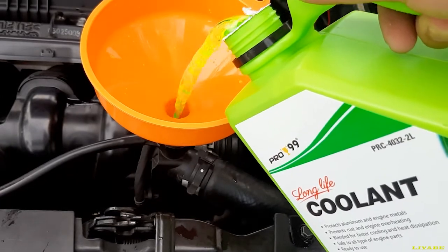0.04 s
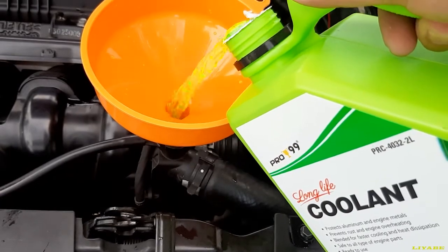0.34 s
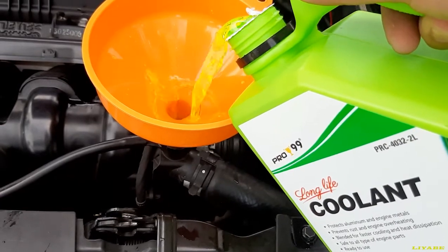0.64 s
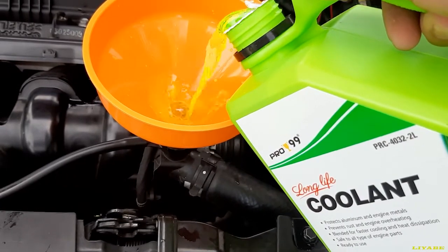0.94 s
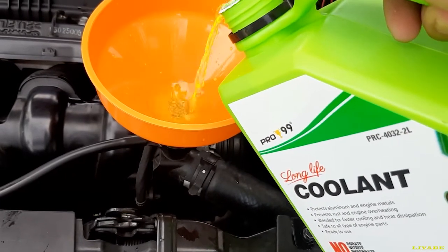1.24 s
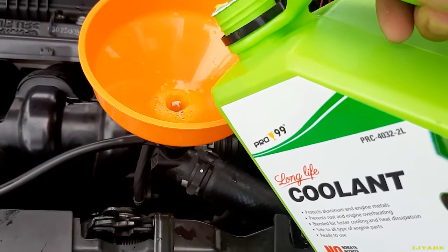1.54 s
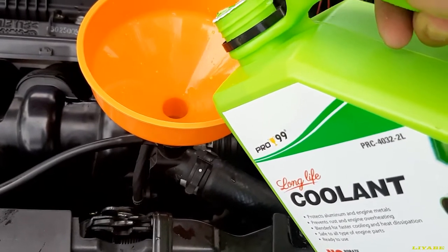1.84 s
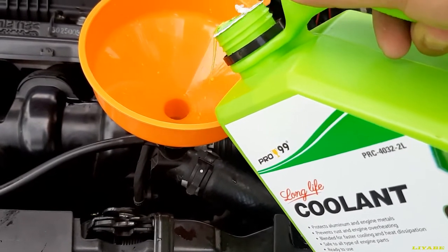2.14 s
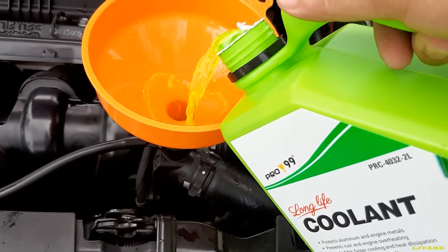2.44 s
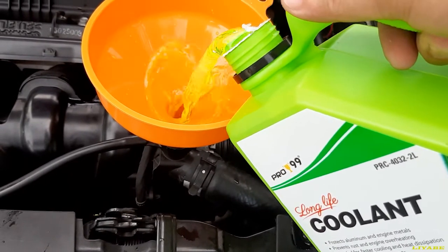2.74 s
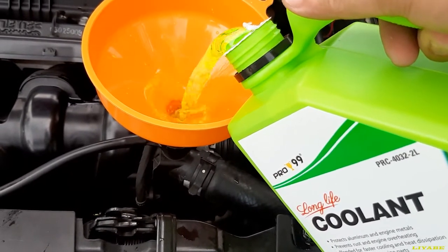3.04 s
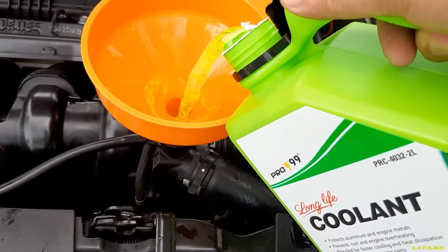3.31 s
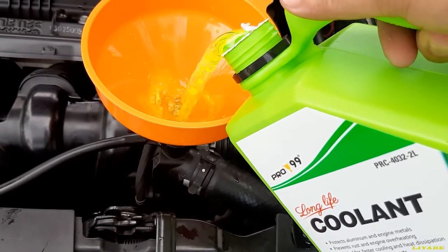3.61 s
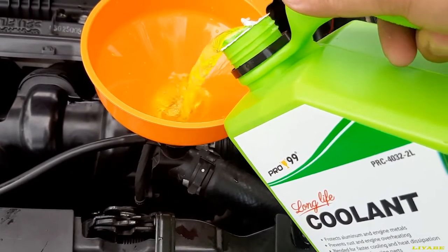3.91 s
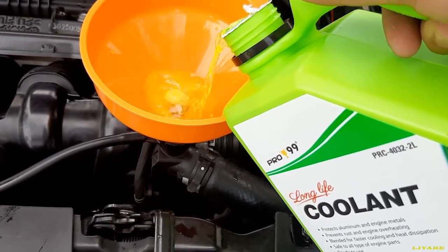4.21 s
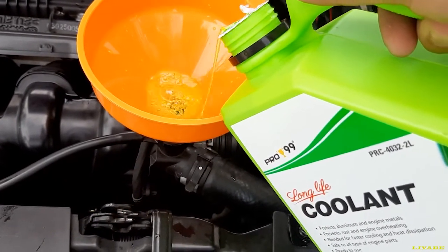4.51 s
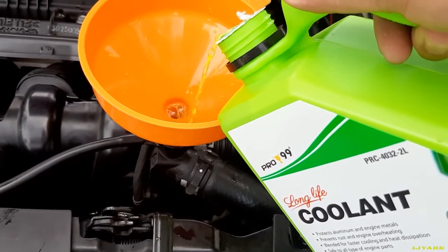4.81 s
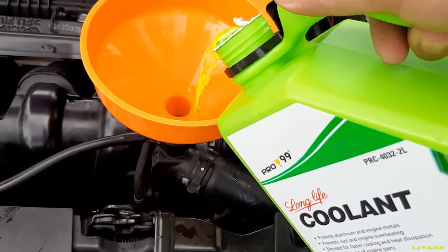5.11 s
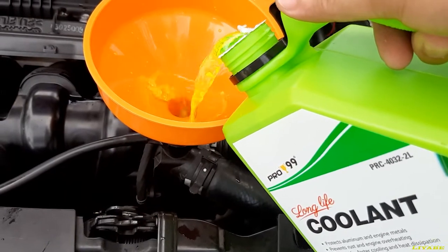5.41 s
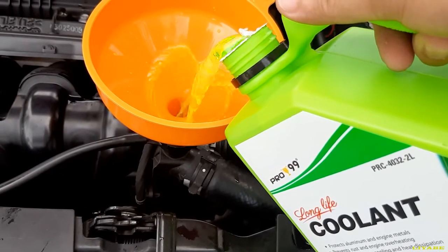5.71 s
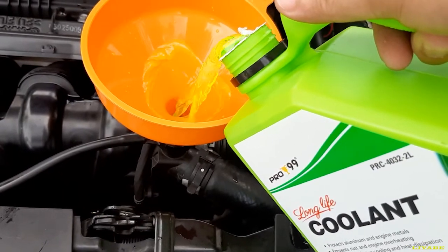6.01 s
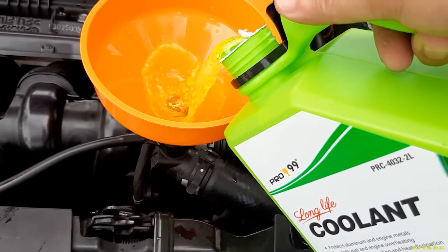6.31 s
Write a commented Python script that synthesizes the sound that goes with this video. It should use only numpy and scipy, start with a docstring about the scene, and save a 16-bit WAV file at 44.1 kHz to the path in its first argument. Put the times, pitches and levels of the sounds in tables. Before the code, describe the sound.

Liquid glugs from a plastic jug into a plastic funnel in three splashy, bubbling pours, with gusts of wind on the microphone.

```python
"""Coolant glugs from a plastic jug into a plastic funnel on a stopped engine, in three pours.
The first starts at once: liquid churns, spray ticks, and trapped air bubbles ring in the funnel's cone.
Gusts soon buffet the microphone, mostly on the right, and air pockets in the neck gulp upward in pitch.
At 2 seconds the wind drops and the stream pauses. The second pour starts near 2.5 seconds and swells.
After another pause, a gentler third pour begins near 5.5 seconds."""
import sys
import numpy as np
from scipy import signal
from scipy.fft import rfft, irfft
from scipy.io import wavfile
from scipy.ndimage import uniform_filter1d

SR = 44100
rng = np.random.default_rng(int(sys.argv[2]) if len(sys.argv) > 2 else 0)


def dump_mix(stems):
    """Bounce the given channels to the path in sys.argv[1] as a 16-bit WAV at rate SR."""
    frames = np.atleast_2d(stems).T  # one column per channel
    limited = np.clip(frames, -1, 1)  # hard clip at full scale
    pcm = np.round(limited * 32767).astype(np.int16)
    wavfile.write(sys.argv[1], SR, pcm)


N = 280035
TIME = np.arange(N) / SR

# Levels in the tables are relative: the functions turn them up or down.
# The stream from the jug. Each row: time in seconds, level in dB.
STREAM = [(0, -29), (.45, -34.5), (.53, -51), (.63, -56.5), (.76, -51), (1.33, -47.5), (1.47, -65.5),
          (1.95, -68), (2.1, -93), (2.48, -74), (2.68, -55), (2.96, -44), (3.14, -33), (3.4, -37.5),
          (3.77, -50.5), (4.08, -47), (4.28, -71.5), (5.45, -71), (5.72, -53), (6.2, -52), (6.35, -50.5)]
# Slugs of liquid hitting the funnel. Each row: start and end in seconds, then churning, spray and
# glugging levels in dB.
SLUGS = [(.15, .2, -28.5, -52, -60), (.342, .37, -30.5, -44, -45.5), (.435, .45, -26, -63, -58),
         (.71, .75, -47.5, -47, -65), (.82, .9, -49.5, -44.5, -68), (.995, 1.03, -33.5, -49.5, -42.5),
         (1.105, 1.135, -46.5, -52, -52), (1.26, 1.33, -39, -47.5, -67), (1.378, 1.395, -36, -60.5, -37.5),
         (1.65, 1.665, -41.5, -59.5, -62), (1.755, 1.78, -45.5, -84, -43.5),
         (1.975, 2.005, -44.5, -72.5, -41.5), (2.69, 2.71, -38.5, -73, -69), (2.825, 2.85, -50, -63, -48.5),
         (2.945, 2.96, -44.5, -58.5, -48), (3.012, 3.04, -39.5, -39.5, -69),
         (3.095, 3.115, -31, -46.5, -40.5), (3.16, 3.18, -29.5, -58.5, -40),
         (3.225, 3.265, -31.5, -48, -49.5), (3.32, 3.35, -34.5, -60, -58), (3.495, 3.55, -47, -46.5, -45.5),
         (3.655, 3.69, -42.5, -50.5, -49.5), (3.812, 3.86, -34.5, -50, -55), (4.115, 4.155, -56, -49, -84),
         (4.38, 4.395, -44.5, -62, -58), (4.625, 4.66, -42.5, -68, -61), (4.69, 4.73, -36.5, -65.5, -46.5),
         (5.725, 5.76, -46, -78, -41.5), (5.915, 5.945, -39.5, -77, -42.5),
         (6.025, 6.045, -42.5, -49.5, -74), (6.125, 6.22, -52, -46, -77)]
# The tone of six sounds. Each row: frequency in Hz, level in dB.
CHURN_TONE = [(400, -23.5), (650, -8), (800, -10), (1130, -5), (1330, -12), (1550, -10), (2100, -1.5),
              (2800, 2.5), (3300, -21.5), (4500, -17.5), (5300, -61.5), (8000, -37), (16000, -70.5)]
GLUG_TONE = [(120, -25), (220, -25), (320, 9), (550, 3), (750, 8.5), (1100, -34), (3000, -64.5)]
SPRAY_TONE = [(800, -15), (2500, 7.5), (4500, 8), (6000, -0.5), (7500, 2), (8700, -8), (10000, -2),
              (11500, 1), (15800, 2.5)]
RUMBLE_TONE = [(12, -45.5), (28, -15), (45, 1.5), (75, 8), (120, 1.5), (190, -9.5), (300, -30.5),
               (600, -38.5), (2000, -85)]
FLUTTER_TONE = [(80, -32.5), (180, 3.5), (260, 4.5), (400, -6.5), (600, -22), (1000, -33.5), (2500, -52.5),
                (6000, -81)]
HISS_TONE = [(100, 5.5), (250, -2.5), (400, -3.5), (700, -9.5), (1500, -13), (3000, -22), (6000, -20),
             (9000, -31.5), (11500, -22.5), (16000, -50.5)]
# Flurries of droplets thrown against the cone. Each row: time in seconds, level in dB.
FLURRIES = [(0.055, -31.5), (0.095, -37), (0.1597, -27.5), (.2042, -41), (0.252, -33), (0.277, -38),
            (.3736, -35), (0.4626, -40.5), (0.763, -26), (0.8015, -40), (.985, -45), (1.0177, -42),
            (1.257, -33), (1.311, -43), (0.559, -56), (2.557, -51.5), (2.934, -36), (3.013, -38),
            (3.0383, -34), (3.1308, -34.5), (3.153, -35), (3.271, -41), (3.5414, -40), (3.816, -34.5),
            (3.8293, -31.5), (4.1236, -41), (5.5762, -53), (5.785, -46), (5.808, -44.5), (5.998, -40.5),
            (6.0253, -35), (6.192, -44)]
# The cone's hum as a thin stream runs down the spout. Each row: time in seconds, level in dB.
CONE_HUM = [(0, -38), (.45, -48), (.6, -85), (1.3, -71), (2.05, -78.5), (2.2, -73), (2.45, -90),
            (2.57, -56), (2.75, -47), (3.1, -52), (3.6, -102), (4.25, -59.5), (4.55, -102), (5.2, -83),
            (5.28, -52.5), (5.4, -74.5), (5.6, -50.5), (6.05, -45.5), (6.35, -72)]
# The notes at which the funnel's air rings. Each row: pitch in Hz, width in Hz, level in dB.
FUNNEL_NOTES = [(795, 70, 0), (1120, 80, 2), (1518, 42, 8), (2036, 55, 6), (2505, 60, 2), (2760, 70, 1),
                (3040, 80, -3), (3800, 200, -7), (4500, 220, 2)]
# Echoes in the engine bay. Each row: frequency in Hz, seconds to fade by 60 dB.
BAY_ECHOES = [(200, 0.17), (1500, 0.22), (4000, 0.1), (14000, 0.097)]
# How much louder the liquid is on the left. Each row: frequency in Hz, lead over the right in dB.
LEFT_LEAD = [(400, 1), (1000, 3), (1600, 3), (2800, 5), (4500, 5.5),
             (7000, .5), (9000, -1), (14000, .5)]
# The breeze on the microphone. Each row: time in seconds, left level in dB, right level in dB.
BREEZE_LEVELS = [(0, -50, -43.5), (.85, -52, -41), (1.35, -44.5, -38), (1.92, -44.5, -32.5),
                 (2.05, -57, -80), (2.9, -56.5, -82), (4.1, -55, -84), (5.1, -55.5, -54.5), (5.5, -54, -56),
                 (5.65, -54.5, -71), (6.35, -59, -68)]
# Bubbles that stand out of the pour. Each row: time in seconds, level in dB, pitch in Hz.
BIG_BUBBLES = [(.041, -19.5, 2650), (0.065, -16.5, 1550), (0.0963, -15.5, 1520), (0.1447, -18, 1540),
               (0.1695, -12, 2300), (0.1954, -12, 1350), (0.2416, -18, 1470), (.254, -15.5, 1670),
               (0.2637, -11.5, 1470), (0.333, -9, 1175), (0.3517, -16.5, 1600), (0.3601, -21, 1600),
               (0.3716, -14.5, 2410), (0.3999, -9.5, 1800), (0.4315, -13, 1990), (0.4412, -17, 1560),
               (0.46, -21.5, 1950), (0.4955, -16, 2230), (0.5598, -32.5, 880), (.659, -30.5, 2013),
               (0.679, -24.5, 1870), (0.6916, -26.5, 2260), (0.7156, -18.5, 2190), (.764, -15.5, 1960),
               (.859, -17, 2230), (0.9992, -27, 1164), (1.047, -28.5, 990), (1.0727, -26.5, 2200),
               (1.1096, -27, 1130), (1.1269, -13, 2370), (1.2272, -22, 1585), (1.256, -26.5, 1543),
               (1.31, -24, 2570), (1.3685, -8.5, 2220), (1.6363, -16, 1367), (1.662, -18.5, 2460),
               (1.825, -31.5, 4590), (1.9925, -33.5, 2270), (2.135, -67, 1550), (2.22, -59, 1600),
               (2.5262, -37.5, 1983), (2.5565, -38, 1537), (2.5921, -41, 858), (2.681, -33.5, 1510),
               (2.7057, -30, 1960), (2.7696, -25, 1400), (2.7973, -29, 1470), (2.8233, -25.5, 1090),
               (2.8392, -25.5, 926), (2.8481, -26, 1230), (2.934, -24, 1670), (2.972, -15, 1870),
               (2.9874, -27, 2054), (3.011, -13, 1550), (3.0368, -23, 2100), (3.0957, -17, 1670),
               (3.1137, -20.5, 1320), (3.1308, -13.5, 1940), (3.1544, -21.5, 2030), (3.163, -13.5, 1830),
               (3.171, -14, 1570), (3.204, -19.5, 1680), (3.231, -18.5, 1840), (3.2608, -13, 1604),
               (3.3126, -25.5, 1720), (3.3417, -9, 2040), (3.3541, -27, 2120), (3.4197, -15.5, 2470),
               (3.4407, -22.5, 2230), (3.5419, -12, 1600), (3.8152, -19.5, 1600), (3.8283, -16, 1140),
               (3.8551, -16.5, 2350), (3.8793, -19, 4360), (3.9885, -29, 3790), (4.0079, -25, 2430),
               (4.0426, -17.5, 1057), (4.0612, -23.5, 768), (4.1235, -28, 2840), (4.1384, -29.5, 2290),
               (4.2067, -44.5, 1100), (4.2365, -42, 1580), (4.3726, -34.5, 1650), (4.3816, -23, 2060),
               (4.4644, -31, 1258), (4.6738, -20, 2145), (4.6892, -24, 2220), (4.7288, -26.5, 962),
               (5.2349, -30, 1690), (5.269, -32, 1462), (5.576, -36, 2750), (5.7036, -26, 2120),
               (5.7702, -35.5, 787), (5.787, -33.5, 1460), (5.8085, -33.5, 1577), (5.9205, -25.5, 1510),
               (5.9509, -25, 2310), (5.9991, -27, 2430), (6.0474, -24, 1870), (6.1107, -23, 1690),
               (6.118, -8, 1730), (6.1731, -27, 2250), (6.19, -22, 3630), (6.232, -23, 4450)]
# The tone of the splat around a big bubble. Each row: frequency in Hz, level in dB.
SPLAT_TONE = [(300, -32.5), (600, -13.5), (800, -4), (1150, 1.5), (1550, 2), (2100, 5.5), (2800, -0.5),
              (3400, -27.5), (4500, -9.5), (5500, -35), (9000, -43)]
# Gusts. Each row: start and end in seconds, left and right rumble in dB, flap pitch in Hz, flap in dB.
WIND_GUSTS = [(0.14, .165, -48, -55, 136, -31), (0.197, 0.3, -45, -33, 180, -33.5),
              (0.625, 0.662, -56, -30, 220, -38), (.688, 0.746, -56, -47, 213, -35),
              (0.918, 0.934, -39, -30, 270, -40.5), (1.011, 1.092, -48, -34, 210, -24.5),
              (1.092, 1.16, -41, -40, 200, -40.5), (1.333, 1.396, -40, -23, 242, -27),
              (1.466, 1.503, -53, -30.5, 300, -28), (1.51, 1.588, -40.5, -24.5, 291, -26),
              (1.539, 1.551, -50, -38, 534, -21), (1.828, 1.856, -51, -22, 285, -26),
              (1.858, 1.941, -51, -34, 180, -23), (3.227, 3.273, -40, -44, 135, -48.5),
              (3.498, 3.523, -40, -45, 131.6, -47.5), (3.688, 3.766, -41.5, -38, 100, -56),
              (5.823, 5.903, -41.5, -74, 150, -60), (5.928, 5.967, -37, -35, 135, -61),
              (6.111, 6.127, -38, -37, 125, -36.5), (6.2, 6.227, -42.5, -70, 110, -49)]
# Thin films of liquid that burst. Each row: time in seconds, level in dB, pitch in Hz.
FILM_BURSTS = [(.146, -29, 13400), (.34, -30.5, 6640), (.482, -26, 12200), (.561, -35, 11700),
               (.764, -43, 7700), (1.128, -38, 9350), (1.26, -26.5, 13300), (1.283, -36, 12500),
               (1.347, -31, 7800), (1.349, -28, 12400), (3.494, -29.5, 5300)]
# Froth sucked through the spout. Each row: start and end in seconds, pitch in Hz, level in dB.
FROTH_SLURPS = [(0.24, 0.249, 2360, -27), (0.44, 0.453, 2750, -23.5), (0.7, 0.751, 2420, -32.5),
                (1.369, 1.375, 2850, -22), (1.63, 1.643, 3040, -33), (1.657, 1.679, 3750, -41.5),
                (1.757, 1.778, 2210, -58), (1.791, 1.848, 4000, -52), (1.912, 2.02, 2300, -56.5),
                (2.703, 2.723, 2020, -52), (2.788, 2.83, 4360, -47.5), (3.003, 3.013, 2700, -30),
                (3.092, 3.109, 2070, -25.5), (3.17, 3.174, 1980, -27), (3.413, 3.437, 2560, -34),
                (3.58, 3.59, 2300, -36), (3.815, 3.836, 2350, -29), (4.61, 4.641, 2100, -60),
                (4.672, 4.734, 1890, -36.5), (4.751, 4.762, 1960, -45.5), (5.317, 5.36, 4200, -66.5),
                (5.702, 5.743, 1370, -45.5), (5.781, 5.805, 5450, -43.5), (5.97, 5.988, 3900, -45),
                (6.022, 6.044, 4730, -38.5)]
# Single swirls of air. Each row: time in seconds, level in dB, pitch in Hz.
AIR_SWIRLS = [(0.281, -19.5, 80), (1.057, -17, 191), (1.075, -14, 132), (1.35, -24, 131.3),
              (1.5234, -16, 306), (1.5422, -23, 614), (1.5448, -21, 476), (1.872, -5.5, 88)]
# Air pockets in the neck. Each row: start and end in seconds, first and last pitch in Hz, level in dB.
AIR_POCKETS = [(0.469, 0.501, 667, 1050, -35.5), (0.95, 0.971, 940, 1060, -46.5),
               (0.985, 1.015, 515, 1660, -34), (1.041, 1.055, 790, 1170, -35),
               (1.88, 1.907, 580, 1114, -42.5), (2.947, 2.959, 717, 880, -29),
               (2.968, 2.993, 1730, 2200, -32), (3.461, 3.49, 541, 980, -34),
               (3.512, 3.561, 890, 1780, -34.5), (3.667, 3.718, 508, 1160, -42),
               (4.055, 4.096, 805, 1580, -39), (4.706, 4.721, 418, 515, -35),
               (5.492, 5.546, 1360, 2000, -53.5), (5.619, 5.697, 1620, 2480, -47),
               (5.808, 5.891, 840, 2050, -50), (6.012, 6.059, 1600, 2400, -36.5),
               (6.077, 6.09, 834, 1190, -39.5), (6.304, 6.35, 310, 620, -48.5)]

FULL_FLOW_DB = -28.5


def amp(db):
    """Turns decibels into a gain."""
    return 10 ** (np.asarray(db) / 20)


def unit(x):
    """Scales a sound to an average power of 1."""
    return x / np.sqrt(np.mean(x ** 2) + 1e-20)


def curve(table, column):
    """Joins a column's points into a value for every sample."""
    rows = np.array(table)
    return np.interp(TIME, rows[:, 0], rows[:, column])


def read(points, hz):
    """Looks up a frequency table at the given frequencies."""
    known_hz, value = np.transpose(points)
    return np.interp(np.log(hz + 1), np.log(known_hz), value)


def add(mix, s, sound):
    """Lays a sound into the mix at s seconds."""
    part = mix[max(round(s * SR), 0):][:len(sound)]
    part += sound[:len(part)]


def convolve(x, response):
    """Filters one or two channels."""
    return signal.fftconvolve(np.atleast_2d(x), np.atleast_2d(response), axes=1)[:, :N]


def colour(x, tone, size=4096):
    """Gives a sound the tone in a table, at a power of 1."""
    log_gain = np.log(amp(read(tone, abs(np.fft.fftfreq(size, 1 / SR)))))
    spectrum = np.exp(np.conj(signal.hilbert(log_gain)))  # rings after a hit, never before
    return unit(convolve(x, np.fft.ifft(spectrum).real))


def steady(x, span_s):
    """Evens out a texture's slow swings and keeps its grain."""
    size = max(int(span_s * SR), 2)
    power = (np.atleast_2d(x) ** 2).mean(0)
    power = uniform_filter1d(uniform_filter1d(power, size), size)
    return x / np.sqrt(abs(power) + 1e-6)


def lurch(depth_db, span_s):
    """A gain that jumps about at random, as the stream breaks into slugs."""
    size = max(int(span_s * SR), 2)
    swing = uniform_filter1d(rng.standard_normal(N), size)
    swing = unit(uniform_filter1d(swing, size // 3 + 1))
    return unit(amp(depth_db * np.clip(swing, -2, 2)))


def patchy(x, depth_db, patch_hz=1400, patch_s=.006):
    """Gives each splash its own tone with random patches in time and pitch."""
    spectra = signal.stft(x, SR, nperseg=128)[2]
    patches = rng.standard_normal(spectra.shape[1:])
    for axis, size in enumerate([patch_hz * 128 / SR, patch_s * SR / 64]):
        patches = uniform_filter1d(patches, max(round(size), 1), axis)
    return signal.istft(spectra * amp(depth_db * unit(patches)), SR, nperseg=128)[1][:, :N]


def swells(table, column, attack_s, release_s, lead_s=.1):
    """The power of events that rise, hold from start to end, then die away."""
    power = np.zeros(N)
    t = np.arange(SR // 2) / SR - lead_s
    for row in table:
        start, end = row[:2]
        early = np.maximum(-t, 0) / attack_s
        late = np.maximum(t - (end - start), 0) / release_s
        add(power, start - lead_s, amp(row[column]) ** 2 * np.exp(-2 * (early ** 2 + late)))
    return power


def burst(texture, start, end, hz, octaves_wide, taper):
    """A short piece of a texture, narrowed to pitches near hz, with soft ends."""
    size = max(int((end - start) * SR), 64)
    octaves = np.log2(np.fft.rfftfreq(8192, 1 / SR) / hz + 1e-6)
    spectrum = rfft(np.roll(texture, 1024 - int(start * SR))[:8192])
    band = irfft(spectrum / (1 + (octaves / octaves_wide) ** 2 / 4) ** 2)[1024:][:size]
    return unit(band * signal.windows.tukey(len(band), taper))


def noise_band(size, hz, width_hz):
    """Noise that is strongest near hz."""
    offset = (np.fft.rfftfreq(size, 1 / SR) - hz) / width_hz
    return irfft(rfft(rng.standard_normal(size)) / (1 + offset ** 2), size)


def bubble(hz, ring_s, rise, onset_cycles):
    """A bubble's note fades 60 dB in ring_s and creeps up in pitch as it nears the surface."""
    t = np.arange(2600) / SR
    ring_s = max(ring_s, .002)
    turns = hz * np.cumsum(1 + rise * (np.minimum(t / ring_s, 1) - 1 / 6)) / SR
    onset = 1 - np.exp(-(t * hz / onset_cycles) ** 2)
    return np.sin(2 * np.pi * turns) * np.exp(-np.log(1000) * t / ring_s) * onset


def swarm(low_hz, high_hz, per_s, cycles, spread_db, count=120):
    """Many bubble notes of random pitch and strength."""
    chance = rng.random(N)
    strength = np.minimum(rng.exponential(1, N), 3)
    kind = rng.integers(0, count, N)
    notes = [(-1) ** k * bubble(hz, cycles / hz, rise=.14, onset_cycles=1.2)
             for k, hz in enumerate(np.geomspace(low_hz, high_hz, count))]
    out = np.zeros(N)
    for i in np.flatnonzero(chance < per_s / SR):
        add(out, i / SR, amp(spread_db * strength[i]) * notes[kind[i]])
    return out


def pour(thin_db=-66.5):
    """Churning, spray and glugging levels in dB follow the stream and jump with each slug."""
    flow = curve(STREAM, 1)
    creeping = np.clip((thin_db - flow) / 10, 0, 1)  # a thin stream creeps down the wall: less spray
    spraying = -44.5 + .66 * (flow - FULL_FLOW_DB) - 8 * creeping
    glugging = -53.5 + .38 * (flow - FULL_FLOW_DB)
    return [10 * np.log10(amp(db) ** 2 + swells(SLUGS, column, attack_s=.014, release_s=.02))
            for column, db in enumerate([flow, spraying, glugging], start=2)]


def churn(churning, glugging):
    """The stream folds small bubbles into the pool; large soft ones glug below them."""
    small = colour(swarm(700, 5500, per_s=1400, cycles=27, spread_db=4.5), CHURN_TONE)[0]
    small = steady(small * lurch(depth_db=2.5, span_s=.007), span_s=.04)
    large = colour(swarm(270, 850, per_s=220, cycles=11, spread_db=3), GLUG_TONE)[0]
    large = steady(large, span_s=.0047)
    return small * amp(churning - 3.5) + large * amp(glugging - 3)


def spray(spraying, per_s=1400, spread_db=5, flurry_s=.0028):
    """Droplets tick on the plastic, in flurries at each spatter and as each listed bubble breaks."""
    ticks = (rng.random(N) < per_s / SR) * amp(spread_db * np.minimum(rng.exponential(1, N), 3))
    ticks *= rng.choice([-1, 1], N)
    mist = rng.standard_normal((2, N))
    drops = steady(.41 * unit(ticks) + .51 * mist, span_s=.024)
    drops = patchy(drops, depth_db=5) * lurch(depth_db=2, span_s=.008)
    flurries = np.zeros(N)
    age = np.arange(1800) / SR / flurry_s
    # louder bubbles throw more spray
    thrown = [(s, spraying[int(s * SR)] + 2.5 + .35 * (db + 19)) for s, db, _ in BIG_BUBBLES]
    for s, db in FLURRIES + thrown:
        add(flurries, s, amp(db + 1) * age * np.exp(1 - age))
    return colour(drops, SPRAY_TONE) * np.hypot(amp(spraying - 1), flurries)


def tiny_bubbles(churning, spraying):
    """Tiny bubbles ping brightly where pool and spray meet, more faintly in a thin stream."""
    pings = swarm(3400, 8000, per_s=650, cycles=50, spread_db=5)
    pings = steady(unit(pings), span_s=.04)
    level_db = .44 * (churning - 11) + .56 * spraying
    thinning_db = np.interp(level_db, [-80, -62, -46], [-14, -7, 0])
    return pings * amp(level_db - 4 + thinning_db)


def trickle():
    """Running liquid unevenly stirs the cone's strongest note into a hum."""
    hum = noise_band(N, hz=1515, width_hz=100) * lurch(depth_db=4, span_s=.014)
    return steady(hum, span_s=.13) * amp(curve(CONE_HUM, 1) - 3)


def funnel(x, ring_db=-5):
    """The air in the cone rings on after every splash."""
    t = np.arange(4000) / SR
    ring = np.zeros(len(t))
    for hz, width, db in FUNNEL_NOTES:
        fade = 2 * np.pi * width / SR * np.exp(-np.pi * width * t)
        ring += amp(db) * fade * np.cos(2 * np.pi * hz * t)
    return x + amp(ring_db) * convolve(x, ring)


def engine_bay(x, near_db=-11, near_s=.014, tail_db=-19, size=12000):
    """Quick echoes off the jug and engine covers, then a faint tail; each side gets its own."""
    t = np.arange(size) / SR
    near, far = rng.standard_normal((2, 2, size)) * (rng.random((2, 2, size)) < .1)
    near = near * np.exp(-t / near_s) * (t > .0012)
    hz, when, spectra = signal.stft(far * (t > .006), SR, nperseg=256)
    fade = np.exp(-np.log(1000) * when / read(BAY_ECHOES, hz)[:, None])
    tail = signal.istft(spectra * fade, SR, nperseg=256)[1][:, :size]
    near, tail = (echo / np.linalg.norm(echo, axis=1, keepdims=True) for echo in (near, tail))
    return convolve(x, amp(near_db) * near + amp(tail_db) * tail)


def microphone_sides(x, lag_s=.000036):
    """The left side hears the funnel a little later, and louder in the middle range."""
    hz = np.fft.rfftfreq(N, 1 / SR)
    lead_db = read(LEFT_LEAD, hz)
    left = amp(lead_db / 2) * np.exp(-2j * np.pi * hz * lag_s)
    return irfft(rfft(x) * [left, amp(-lead_db / 2)], N)


def wind():
    """Rough air rumbles on each side separately; the right flutters more in a brisk breeze."""
    breeze_db = np.array([curve(BREEZE_LEVELS, column) for column in (1, 2)])
    gust_power = [swells(WIND_GUSTS, column, attack_s=.017, release_s=.022) for column in (2, 3)]
    level = np.sqrt(amp(breeze_db) ** 2 + gust_power)
    rumble = [steady(colour(rng.standard_normal(N), RUMBLE_TONE)[0], span_s=.035) for _ in level]
    flutter = [steady(colour(rng.standard_normal(N), FLUTTER_TONE)[0], span_s=.026) for _ in level]
    flutter_db = [np.full(N, -15), np.interp(breeze_db[1], [-54, -40], [-28, -12])]
    return level * (amp(-2) * np.array(rumble) + amp(flutter_db) * np.array(flutter))


def outdoors(level_db=-70):
    """A faint, even background hiss."""
    hiss = colour(rng.standard_normal((2, N)), HISS_TONE)
    hiss = signal.sosfilt(signal.butter(2, 250, "high", fs=SR, output="sos"), hiss)
    return amp(level_db) * unit(hiss)


def stray_bubbles(churning, centre_hz=1850, octaves=.4, least_db=-54, count=150):
    """Bubbles pinch off at random while the pool churns; gives rows like BIG_BUBBLES."""
    when = (np.arange(count) + rng.random(count)) / count * (N - 1)
    level = churning[when.astype(int)]
    strength, pitch = np.clip(rng.standard_normal((count, 2)), -2, 2).T
    db = FULL_FLOW_DB + 5 + .8 * (level - FULL_FLOW_DB) + 2 * strength
    rows = np.transpose([when / SR, db, centre_hz * 2 ** (octaves * pitch)])
    return list(rows[level > least_db])


def big_bubbles(churning, splat_s=.0045):
    """Each big bubble pinches off with a wet splat, rings, and sheds a smaller twin."""
    rings, splats = np.zeros(N), np.zeros(N)
    t = np.arange(1500) / SR
    splat_shape = np.exp(-t / splat_s) * (1 - np.exp(-t / .001))
    rows = BIG_BUBBLES + stray_bubbles(churning)
    for (s, db, hz), (late, smaller) in zip(rows, rng.random((400, 2))):
        calm = np.interp(db, [-35, -26], [1, 0])  # quiet drips start softly and splash less
        ring_s = .018 * 2 ** (-(db + 20) / 42) * (1800 / hz) ** .75  # violent or small ones die sooner
        ring_s *= np.interp(churning[int(s * SR)], [-65, -35], [1.45, 1])  # longer in a still pool
        ring = bubble(hz, ring_s, rise=.05, onset_cycles=.8 + 20 * ring_s + 1.5 * calm)
        add(rings, s, amp(db - .5) * ring / abs(ring).max())
        splash_db = db - 9 * calm
        twin = bubble(hz * (1.15 + .9 * smaller), ring_s / 2, rise=.1, onset_cycles=3)
        add(rings, s + .0015 * late, amp(splash_db - 11) * twin)
        add(splats, s - .001, amp(splash_db - 10) * splat_shape)
    splats *= rng.standard_normal(N)
    return rings + np.std(splats) * colour(splats, SPLAT_TONE)[0]


def gusts(left_db=-22):
    """Hard gusts flap in round, low lumps, mostly on the right."""
    out = np.zeros(N)
    lumps = swarm(97, 700, per_s=260, cycles=9, spread_db=6)
    for start, end, _, _, hz, db in WIND_GUSTS:
        add(out, start, amp(db - 1) * burst(lumps, start, end, hz, octaves_wide=.52, taper=.3))
    return out * amp([[left_db], [0]])


def fizzes(fade_s=.0023, size=1024):
    """A bursting film hisses for a few milliseconds."""
    out = np.zeros(N)
    age = np.arange(size) / SR / fade_s
    for s, db, hz in FILM_BURSTS:
        hiss = unit(noise_band(size, hz, width_hz=1300))
        add(out, s, amp(db) / 2 * age * np.exp(1 - age) * hiss)
    return out


def slurps():
    """Dense froth tears in the spout with a soft, wide rasp."""
    out = np.zeros(N)
    froth = swarm(600, 6000, per_s=5400, cycles=14, spread_db=4)
    for start, end, hz, db in FROTH_SLURPS:
        add(out, start, amp(db) * burst(froth, start, end, hz, octaves_wide=.25, taper=.28))
    return out


def swirls():
    """A swirl of air slaps the microphone's right side: a push between two sucks."""
    out = np.zeros((2, N))
    for s, db, hz in AIR_SWIRLS:
        t = np.arange(-2 / hz, 2 / hz, 1 / SR)
        spread = (np.pi * hz * t) ** 2
        add(out[1], s + t[0], amp(db) * (1 - 2 * spread) * np.exp(-spread))
    return out


def gulps(step_s=.0037, spread_db=4):
    """A shrinking air pocket pinches off a quick chain of ever smaller, higher bubbles."""
    out = np.zeros(N)
    for start, end, from_hz, to_hz, db in AIR_POCKETS:
        length = end - start
        chain = np.zeros(int(length * SR) + 2600)
        for t, (late, detune, strength) in zip(np.arange(0, length, step_s), rng.normal(size=(40, 3))):
            hz = from_hz * (to_hz / from_hz) ** (t / length) * np.exp(.06 * detune)
            blip = bubble(hz, 21 / hz, rise=.15, onset_cycles=1)
            add(chain, t + step_s * late / 3, amp(spread_db * strength) * blip)
        add(out, start, amp(db) * chain * np.sqrt(length * SR / np.sum(chain ** 2)))
    return out


def scene():
    """Mixes the liquid in the funnel, its echoes, the wind and the background."""
    churning, spraying, glugging = pour()
    pool = big_bubbles(churning) + gulps() + churn(churning, glugging) + slurps()
    splashes = amp(-6) * pool + spray(spraying) + tiny_bubbles(churning, spraying)
    liquid = funnel(splashes) + trickle() + fizzes()
    return microphone_sides(liquid + engine_bay(liquid)) + wind() + gusts() + swirls() + outdoors()


def record(dry, low_hz=38, high_hz=15900):
    """Cuts the deepest rumble and the highest treble."""
    cut = signal.sosfilt(signal.butter(3, low_hz, "high", fs=SR, output="sos"), dry)
    treble_cut = signal.firwin(511, high_hz, window=("kaiser", 9), fs=SR)
    return signal.oaconvolve(cut, treble_cut[None], "same")


dry = scene()
out = record(dry)
dump_mix(out)
```